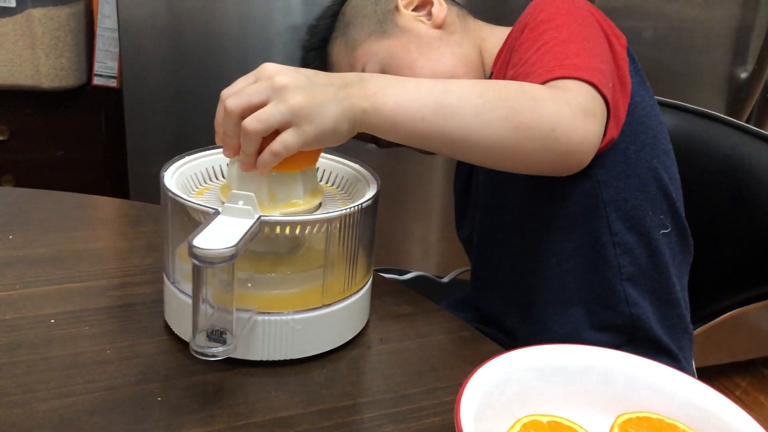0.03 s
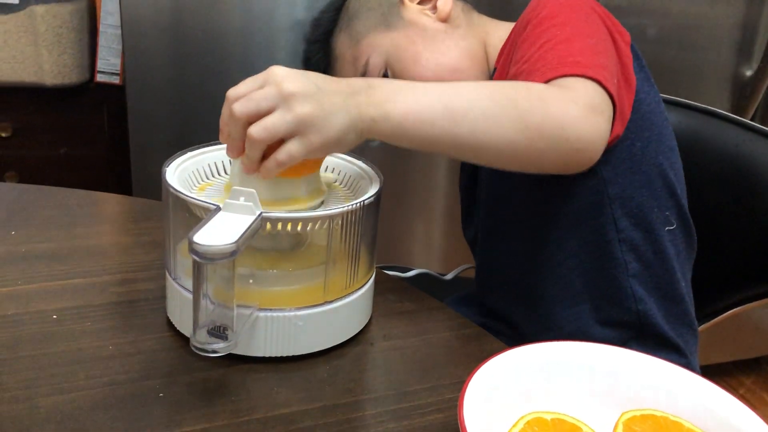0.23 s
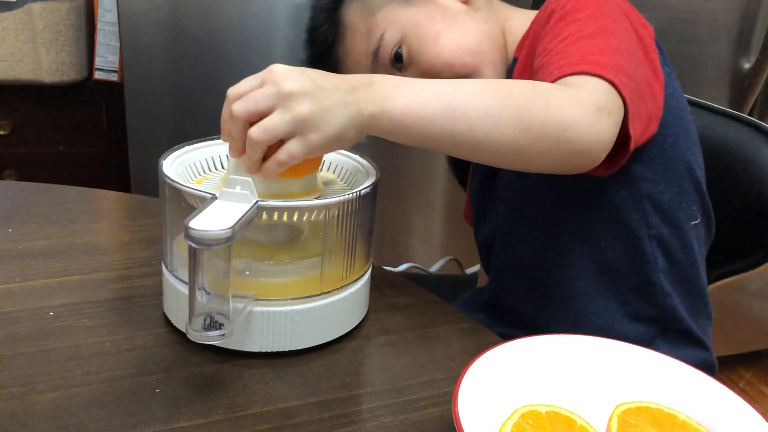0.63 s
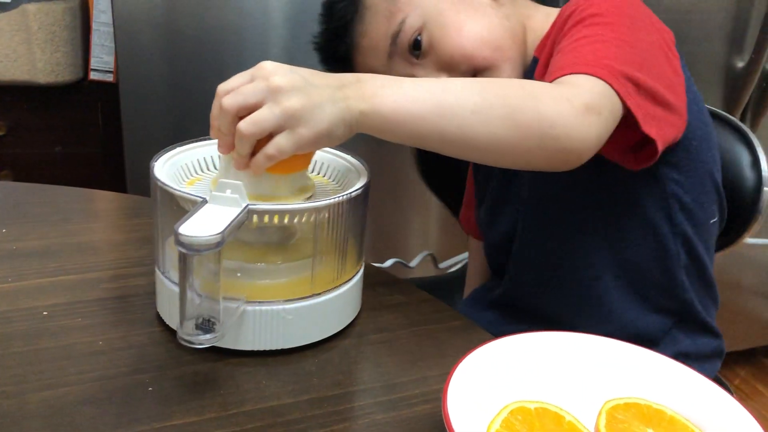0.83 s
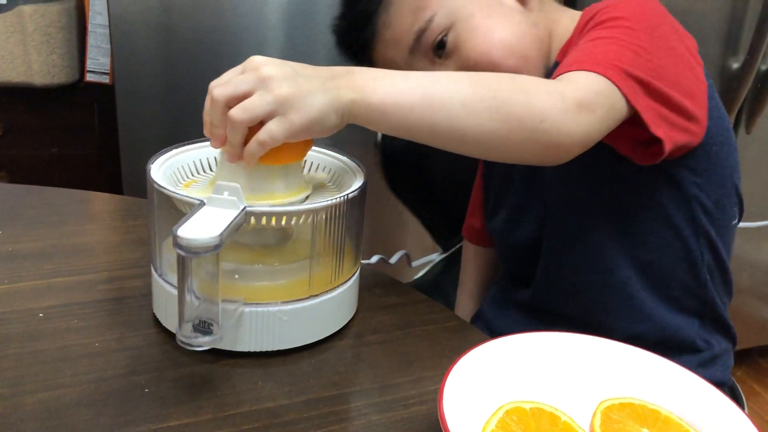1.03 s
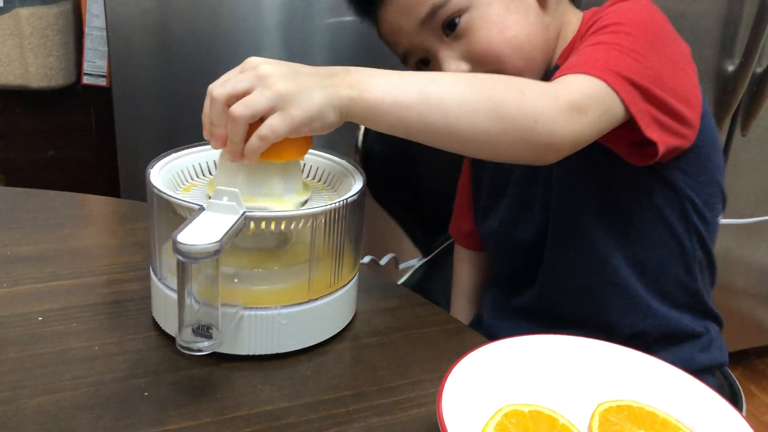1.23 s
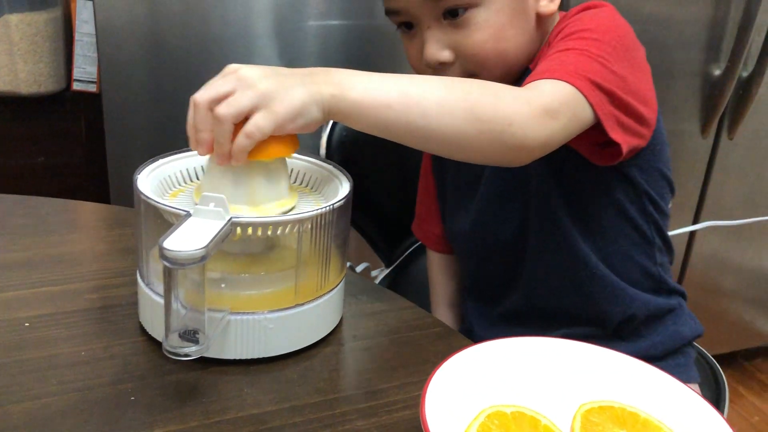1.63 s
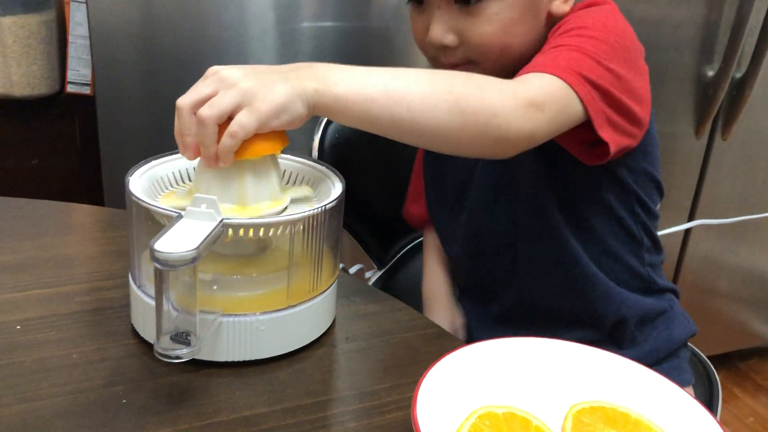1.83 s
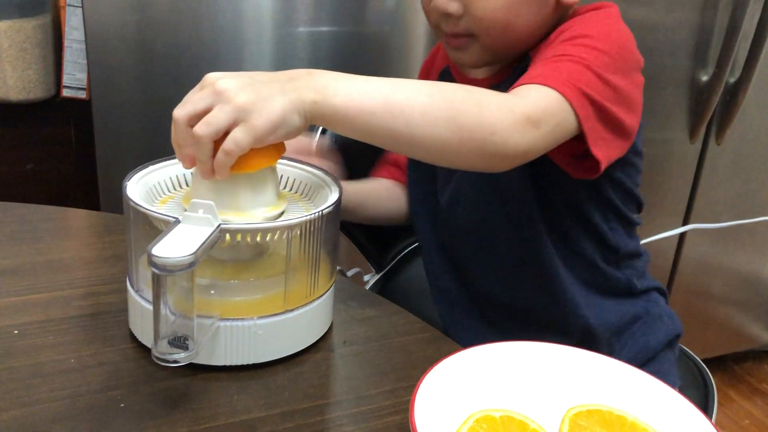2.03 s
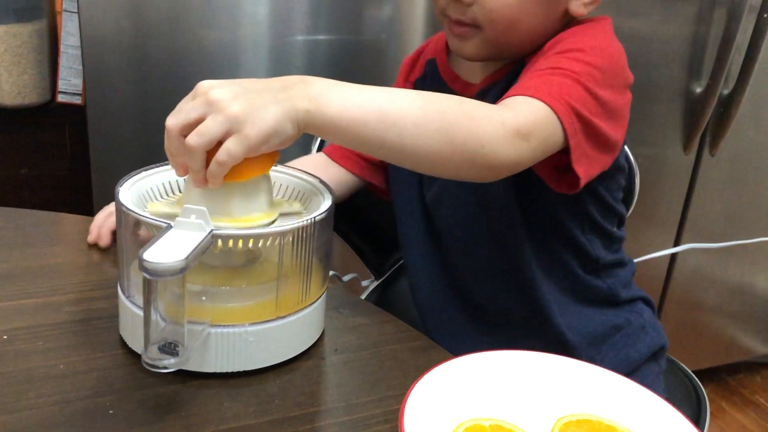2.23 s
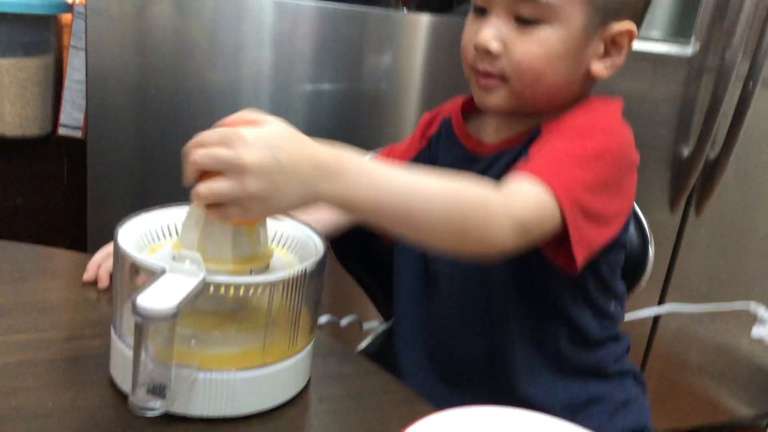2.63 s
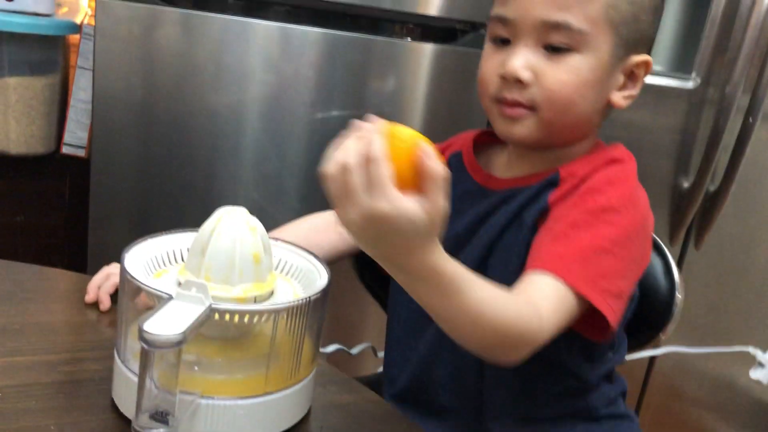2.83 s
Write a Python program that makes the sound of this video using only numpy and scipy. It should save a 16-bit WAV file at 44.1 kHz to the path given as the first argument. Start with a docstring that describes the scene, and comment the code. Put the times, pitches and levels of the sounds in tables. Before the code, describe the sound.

Electric juicer motor rattling as it squeezes an orange, with a few plastic knocks, then stopping.

```python
"""Faint finger taps, then an electric citrus juicer grinds into half an orange, on a kitchen table
close to one microphone. The mains motor jerks its plastic gears 120 times a second, in a pattern that
repeats with each rotor turn: the housing booms, the jug clacks, the teeth scrape, the pulp tears.
A few knocks, snaps and a bright tick stand out. The orange is lifted, the gears coast to rest,
and an arm rustles away in the quiet room."""
import sys
import numpy as np
from scipy import signal
from scipy.fft import rfft, irfft
from scipy.io import wavfile
from scipy.ndimage import uniform_filter1d

SR = 44100
rng = np.random.default_rng(int(sys.argv[2]) if len(sys.argv) > 2 else 0)


def generate_wav(sig):
    """Save sig (samples, or channels by samples) to the path in sys.argv[1] as 16-bit PCM at SR."""
    pcm = np.round(np.clip(np.atleast_2d(sig).T, -1, 1) * 32767).astype(np.int16)
    wavfile.write(sys.argv[1], SR, pcm)


N = 127890
T = np.arange(N) / SR
JERK_HZ = 120  # twice the mains frequency
FULL_SPEED_S, OFF_S, SPIN_UP_S, CUT_S = 0.22, 2.59, 0.012, 0.005
COAST_HZ, SLOWING_HZ_PER_S = 115, 410

# One rotor turn, a jerk per pole. Each row: gear blow in dB, tooth scrape in dB.
POLE_JERKS = [(-1.5, 3.5), (-3.5, 1.5), (-1.5, 3.5), (-4, -6), (0, 6), (-14, -1), (0.5, 0), (1, 3.5),
              (-6, -5.5), (-5, -2), (-1.5, 6.5), (-8.5, -4), (-3, 2.5), (-7.5, -3.5)]
# Loudness of the parts under the hand's pressure. Each row: time in seconds, level in dB.
HOUSING_LEVEL = [(0.24, -29.5), (0.47, -31), (0.69, -29.5), (0.76, -33), (1.01, -29.5), (1.69, -32),
                 (2.57, -31)]
JUG_LEVEL = [(.22, -33), (.4, -34.5), (.7, -34), (1.0, -35), (1.25, -33.5), (1.55, -33.5), (2.05, -35),
             (2.25, -31), (2.57, -33.5)]
NASAL_LEVEL = [(.22, -36), (.4, -30), (.7, -34), (1.0, -34), (1.3, -46), (1.9, -40), (2.57, -52)]  # the jug's nasal ring, strongest early on
TEETH_LEVEL = [(.22, -33.5), (.3, -36), (.55, -34.5), (.8, -33), (.95, -35.5), (1.05, -34), (1.3, -36),
               (1.65, -34), (2.05, -35), (2.3, -34.5), (2.57, -35)]
PULP_LEVEL = [(.22, -42), (.3, -45), (.55, -48), (.8, -49.5), (1.3, -52.5), (1.65, -46.5), (2.0, -51),
              (2.15, -49), (2.35, -47.5), (2.43, -47), (2.57, -50)]
# What those parts ring with. Each row: frequency in Hz, relative level in dB per Hz.
HOUSING_COLOUR = [(40, -54), (80, -28), (150, -14), (200, -23), (275, -16.5), (345, -20), (415, -13.5),
                  (455, -2.5), (482, 1.5), (520, -4), (570, -12.5), (622, -4.5), (700, -12), (780, -8),
                  (900, -13), (1010, -8.5), (1150, -15.5), (1500, -13), (3000, -41)]
JUG_COLOUR = [(600, -57), (1100, -15.5), (1280, -9.5), (1470, 2), (1720, 1.5), (1860, -4.5), (1990, -10),
              (2080, -3.5), (2300, -6), (2600, -24), (5000, -77)]
NASAL_COLOUR = [(800, -63), (1500, -15), (1620, -3), (1705, -5.5), (1800, -6.5), (1920, -16.5), (3500, -62)]
TEETH_COLOUR = [(1200, -41), (2300, -13.5), (2540, -2), (2680, -6.5), (2920, 3), (3150, -4.5),
                (3450, -11.5), (4050, -6.5), (4400, -17), (5000, -12.5), (5450, -10.5), (6600, -17),
                (8000, -29), (16000, -40)]
PULP_COLOUR = [(3000, -55), (6000, -5), (7400, -0.5), (8700, -2.5), (10500, -5), (11800, -5.5),
               (13500, -16), (16000, -10.5)]
# Steady tones of mains and rotor. Each row: frequency in Hz, level in dB.
HUM_TONES = [(60, -58), (120, -55), (274.3, -58), (420, -52.5), (829, -47), (1011, -75)]
# Gears catching under load. Each row: start in seconds, clack in dB, ring of the jug in dB.
GEAR_KNOCKS = [(.238, -24, -24), (0.3143, -25, -38), (.353, -32, -27), (.551, -20.5, -25.5),
               (0.625, -21, -32), (0.7752, -25, -40), (0.8326, -24, -36), (.864, -26, -38),
               (.9492, -24, -17), (1.0242, -26, -29), (1.067, -24, -24), (1.716, -39, -35),
               (2.1825, -18, -30), (2.427, -26.5, -34)]
# Small impacts. Each row: start in seconds, strength in dB.
PLASTIC_SNAPS = [(.151, -42.5), (.2008, -52), (.9706, -13)]
TINK_BOUNCES = [(2.2117, -27), (2.2185, -32)]
FINGER_TAPS = [(.1095, -49.5), (.127, -62), (.178, -68)]
# Tone of each kind of impact. Each row: frequency in Hz, relative level in dB per Hz.
KNOCK_COLOUR = [(100, -24.5), (480, 0.5), (1000, -2), (1750, -3), (2200, -1.5), (3000, -3), (4500, -7),
                (7000, -13.5), (16000, -39.5)]
SNAP_COLOUR = [(200, -13), (900, -2), (1400, 0), (2200, -7), (3200, 5), (4200, 3.5), (5500, -9),
               (7700, 0.5), (10000, -3), (13000, -8.5), (16000, -14)]
TINK_COLOUR = [(3000, -45), (6500, -25), (7400, 2), (8600, 6), (9500, -10), (13000, -12), (16000, -16)]
TAP_COLOUR = [(300, -15), (1500, -8), (2500, -5), (3350, 2), (4200, 3), (5200, -16), (9000, -31),
              (16000, -32)]
# Modes of a small hard object. Each row: frequency in Hz, relative level in dB, seconds to fall 60 dB.
TINK_MODES = [(7219, -7, .045), (7550, 0.5, 0.051), (7840, -8, 0.075), (8473, -10, .06), (9200, -16, .06),
              (10130, -13, 0.066), (11400, -14, 0.046), (12700, -10, .06), (14700, -16, .05)]
# Loudness of the coasting gears and the moving arm. Each row: time in seconds, level in dB.
COAST_LEVEL = [(2.55, -70), (2.59, -45), (2.63, -40.5), (2.71, -42), (2.77, -50.5), (2.82, -59),
               (2.88, -77)]
RUSTLE_LEVEL = [(2.83, -95), (2.86, -62), (2.9, -63.5)]
# Tone of coasting gears, arm and room noise. Each row: frequency in Hz, relative level in dB per Hz.
COAST_COLOUR = [(88, -50), (150, -35), (330, -26), (480, -0.5), (570, -14.5), (790, -0.5), (1000, -3.5),
                (1320, -16.5), (1760, -6.5), (2050, -12.5), (2900, -20.5), (4000, -30.5), (5500, -26),
                (8000, -53), (15000, -59)]
RUSTLE_COLOUR = [(200, -1), (1500, -2.5), (5000, -5), (9000, -11), (16000, -15.5)]
ROOM_TONE_COLOUR = [(20, -21), (30, -7), (45, -15), (65, -3.5), (110, -8), (200, -10), (300, -11),
                    (450, -23), (700, -23), (1200, -35), (3000, -38), (6000, -39), (10000, -47),
                    (16000, -52)]
# Thin whine in the room. Each row: centre in Hz, width in Hz, level in dB.
WHINE_BANDS = [(1597, 20, -73), (2896, 35, -77), (13765, 60, -86)]
# The kitchen's reverberation. Each row: frequency in Hz, seconds to fall 60 dB.
ROOM_DECAY = [(100, 0.29), (1000, 0.23), (4000, 0.3), (15000, 0.23)]


def motor():
    """Close up, the driven gears shake housing and jug, scrape and tear the pulp, over a steady hum."""
    blow_db, scrape_db = np.transpose(POLE_JERKS)
    wobble = 2 * rng.random((int(N / SR * JERK_HZ), 2)) - 1  # strength and timing of each jerk
    thumps = chatter(.5 * blow_db, wobble, repeat=.22, per_s=12000, rise_s=.00026, decay_s=.0062,
                     lag_s=.00083, rub=.42, uneven_db=2.5, loose_s=.0008)
    clacks = chatter(blow_db, wobble, repeat=.25, per_s=12000, rise_s=.0011, decay_s=.0042,
                     lag_s=.0013, rub=.55, uneven_db=6.5, loose_s=.00086)
    scrapes = chatter(scrape_db, wobble, repeat=.023, per_s=7000, rise_s=.0004, decay_s=.0071,
                      lag_s=-.00069, rub=.3, uneven_db=6.5, loose_s=.0021)
    crackle = chatter(scrape_db, wobble, repeat=.02, per_s=3100, rise_s=.0012, decay_s=.003,
                      lag_s=-.00032, rub=.34, uneven_db=9, loose_s=.0016)
    parts = [(thumps, HOUSING_COLOUR, HOUSING_LEVEL),
             (clacks, JUG_COLOUR, JUG_LEVEL),
             (clacks, NASAL_COLOUR, NASAL_LEVEL),
             (scrapes, TEETH_COLOUR, TEETH_LEVEL),
             (crackle, PULP_COLOUR, PULP_LEVEL)]
    grind = sum(unit(ring(force, colour)) * level(curve) for force, colour, curve in parts)
    hum = sum(amp(db) * np.sqrt(2) * np.sin(2 * np.pi * (hz * T + rng.random())) for hz, db in HUM_TONES)
    running = np.exp(np.minimum(T - FULL_SPEED_S, 0) / SPIN_UP_S - np.maximum(T - OFF_S, 0) / CUT_S)
    return running * (grind + hum)


def chatter(pattern_db, wobble, repeat, per_s, rise_s, decay_s, lag_s, rub, uneven_db, loose_s):
    """Each jerk sets off a burst of tooth impacts; the share `repeat` comes back alike on every turn."""
    poles = len(pattern_db)
    jerk = np.arange(len(wobble))
    start_s = jerk / JERK_HZ + lag_s + loose_s * wobble[:, 1]
    strength = amp(pattern_db[jerk % poles] + uneven_db * wobble[:, 0])
    jerks = np.bincount(np.clip(start_s * SR, 0, N - 1).astype(int), strength, N)
    burst = (1 - np.exp(-T / rise_s)) * np.exp(-T / decay_s)
    force = rub + signal.fftconvolve(jerks, burst / burst.max())[:N]
    turn_samples = round(poles * SR / JERK_HZ)
    turn_noise = irfft(np.exp(2j * np.pi * rng.random(turn_samples // 2 + 1)), turn_samples)
    repeating = np.sqrt(repeat) * unit(np.resize(turn_noise, N))
    fresh = np.sqrt(1 - repeat) * grains(per_s, spread_db=2)
    return unit(force * (repeating + fresh))


def coast():
    """With the orange lifted the gears tick on, ever slower."""
    speed_hz = np.maximum(COAST_HZ - SLOWING_HZ_PER_S * np.maximum(T - OFF_S, 0), 0)
    turns = np.cumsum(speed_hz) / SR
    ticks = (0.6 + np.exp(-(turns % 1) / 0.23)) * grains(per_s=2400, spread_db=6)
    return ring(unit(ticks), COAST_COLOUR) * level(COAST_LEVEL)


def knocks():
    """The gears catch under load with a clack, and the jug rings."""
    start_s, clack_db, ring_db = np.transpose(GEAR_KNOCKS)
    clack = hits(zip(start_s, clack_db), KNOCK_COLOUR, decay_s=.0032, buzz=.1, buzz_s=.008)
    jug = hits(zip(start_s, ring_db), NASAL_COLOUR, decay_s=.0032, buzz=.02, buzz_s=.008)
    return clack + jug


def snaps():
    """Plastic snaps with a sharp first crack."""
    return hits(PLASTIC_SNAPS, SNAP_COLOUR, decay_s=.0022, buzz=.12, buzz_s=.012, crack=2.2)


def tinks():
    """Something small and hard bounces: a scratchy contact and a brief, bright ring."""
    ringing = np.zeros(N)
    for start_s, db in TINK_BOUNCES:
        t = np.maximum(T - start_s, 0)
        for hz, mode_db, t60 in TINK_MODES:
            ringing += amp(db + mode_db - 60 * t / t60) * np.sin(2 * np.pi * hz * t)
    return ringing + amp(-3) * hits(TINK_BOUNCES, TINK_COLOUR, decay_s=.003, buzz=.37, buzz_s=.016)


def taps():
    """Fingers shift on the peel with dull ticks."""
    return hits(FINGER_TAPS, TAP_COLOUR, decay_s=.0071, buzz=.11, buzz_s=.015)


def rustle():
    """Soft noise as the arm moves away."""
    return ring(rng.standard_normal(N), RUSTLE_COLOUR) * level(RUSTLE_LEVEL)


def reflections(x, wet_db):
    """Sparse kitchen echoes reach the microphone from 3 ms on, each band dying at its own speed."""
    size = SR // 2
    arrivals = rng.choice([-1., 1.], size) * (rng.random(size) < 3000 / SR) * (T[:size] > .003)
    hz, t, bands = signal.stft(arrivals, SR, nperseg=256)
    decay = amp(-60 * t / at_hz(ROOM_DECAY, hz)[:, None])
    tail = signal.istft(bands * decay, SR, nperseg=256)[1]
    echo = amp(wet_db) * tail / np.linalg.norm(tail)
    echo[0] += 1  # the direct sound
    response = rfft(echo, SR)
    response /= np.sqrt(uniform_filter1d(abs(response) ** 2, size=45))  # keeps the tone uncoloured
    return signal.fftconvolve(x, irfft(response, SR)[:size])[:N]


def room_tone():
    """Behind the juicer, the kitchen's low noise and a thin whine."""
    hz = np.fft.rfftfreq(N, 1 / SR)
    whine = np.zeros(N)
    for centre_hz, width_hz, db in WHINE_BANDS:
        peak = 1 / (1 + (2 * (hz - centre_hz) / width_hz) ** 2)
        whine += amp(db) * unit(irfft(rfft(rng.standard_normal(N)) * peak, N))
    return amp(-55.5) * ring(rng.standard_normal(N), ROOM_TONE_COLOUR) + whine


def hits(rows, colour, decay_s, buzz, buzz_s, crack=0):
    """A short burst of contact rings a body, which buzzes on for a moment."""
    force = np.zeros(N)
    for start_s, db in rows:
        start = round(start_s * SR)
        t = T[:N - start]
        burst = (np.exp(-t / decay_s) + buzz * np.exp(-t / buzz_s)) * rng.choice([-1., 1.], len(t))
        burst[0] = crack
        force[start:] += amp(db) * burst
    return ring(force, colour)


def grains(per_s, spread_db):
    """A train of tiny impacts of uneven size."""
    size = amp(spread_db * np.clip(rng.standard_normal(N), -2, 2))
    return unit(size * rng.choice([-1., 1.], N) * (rng.random(N) < per_s / SR))


def ring(x, colour):
    """Passes x through a minimum-phase body with this colour and energy gain 1."""
    hz = abs(np.fft.fftfreq(8192, 1 / SR))
    log_gain = np.log(amp(at_hz(colour, hz)))
    response = np.exp(np.conj(signal.hilbert(log_gain)))
    body = np.fft.ifft(response).real[:4096]
    return signal.oaconvolve(x, body / np.linalg.norm(body))[:N]


def at_hz(table, hz):
    """Reads a table on a log-frequency axis."""
    table_hz, value = np.transpose(table)
    return np.interp(np.log(hz + 1), np.log(table_hz + 1), value)


def level(curve):
    """Gain over time from rows of seconds and dB."""
    return amp(np.interp(T, *np.transpose(curve)))


def amp(db):
    """Decibels to gain."""
    return 10 ** (np.asarray(db) / 20)


def unit(x):
    """Scales to rms 1."""
    return x / np.sqrt(np.mean(x ** 2) + 1e-20)


def scene():
    """The juicer close up, the kitchen behind it, in mono."""
    impacts = knocks() + snaps() + taps() + tinks()
    juicer = motor() + coast() + impacts
    return (reflections(juicer, wet_db=-8.5) + rustle() + room_tone())[None]


def record(dry):
    """The recorder cuts off above 16 kHz."""
    lowpass = signal.firwin(511, 16000, window=("kaiser", 9), fs=SR)
    return signal.oaconvolve(dry, lowpass[None], "same")


dry = scene()
out = record(dry)
generate_wav(out)
```